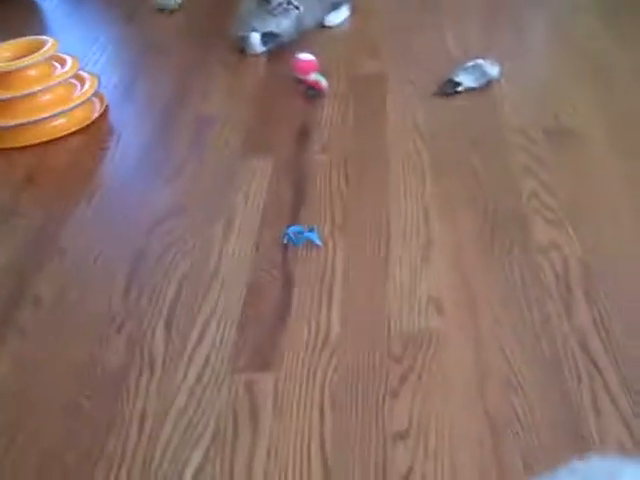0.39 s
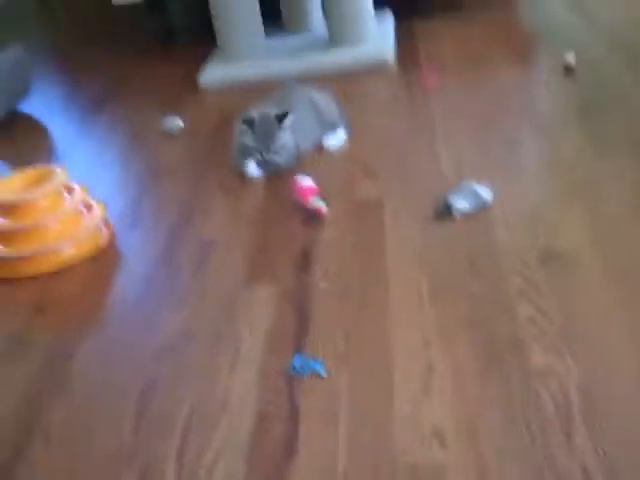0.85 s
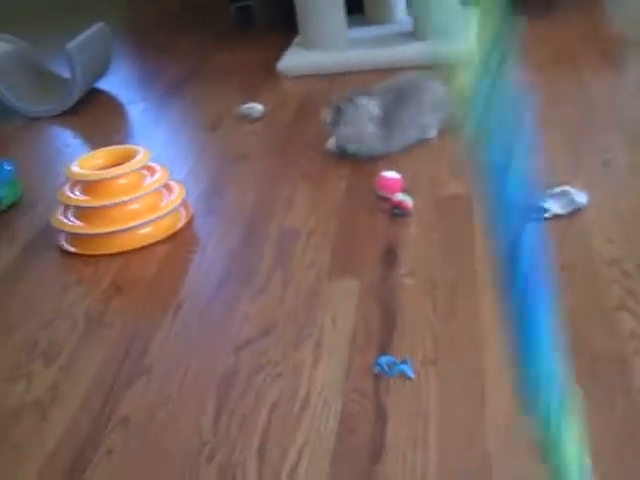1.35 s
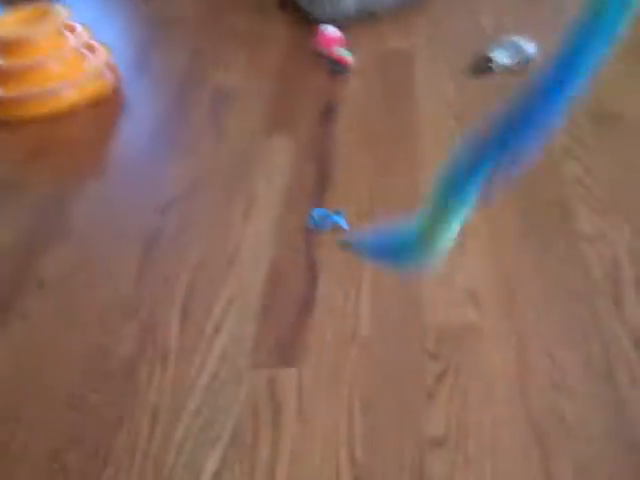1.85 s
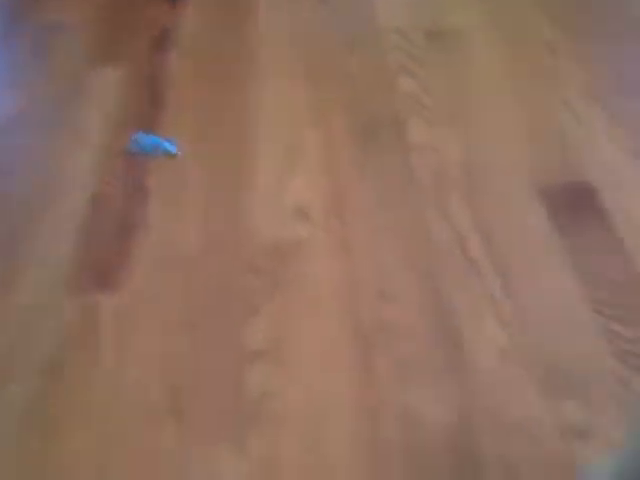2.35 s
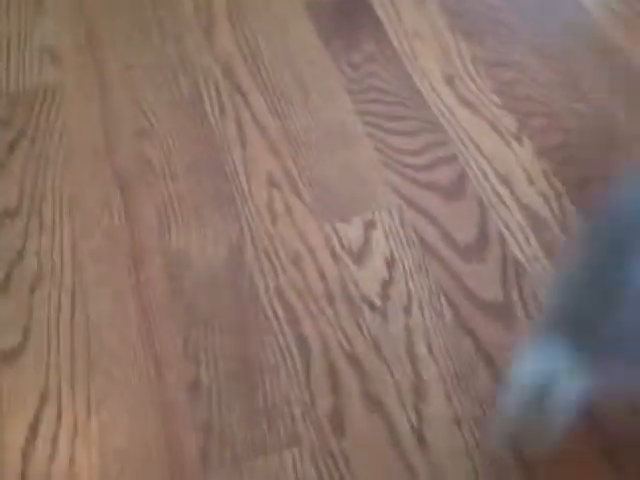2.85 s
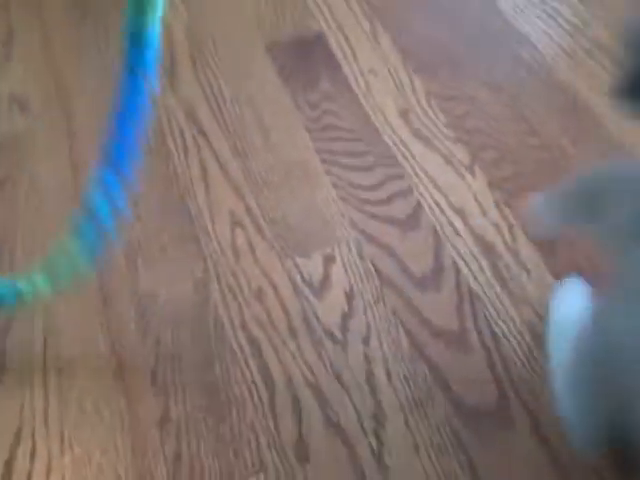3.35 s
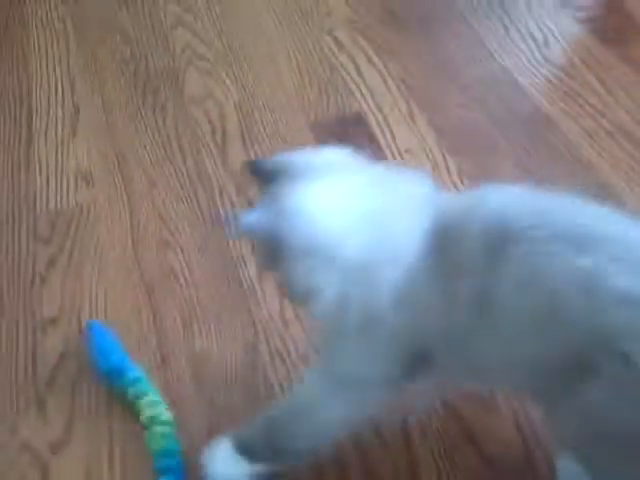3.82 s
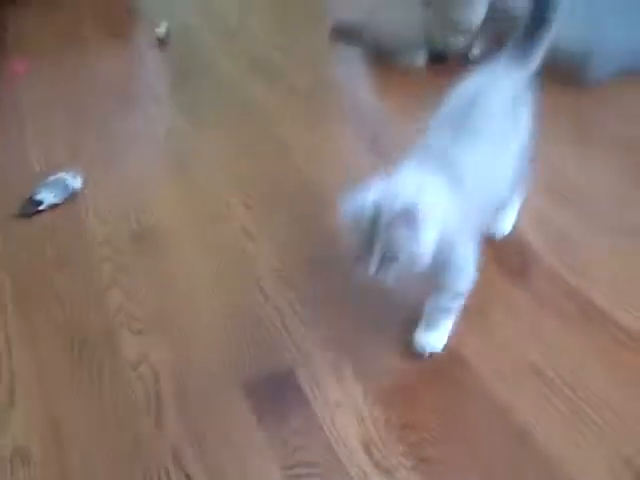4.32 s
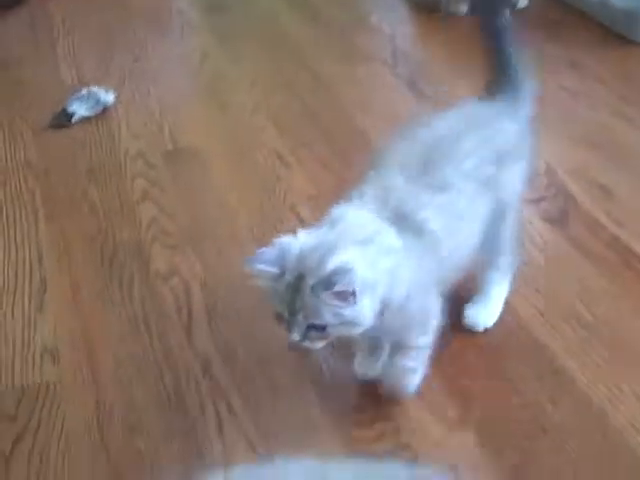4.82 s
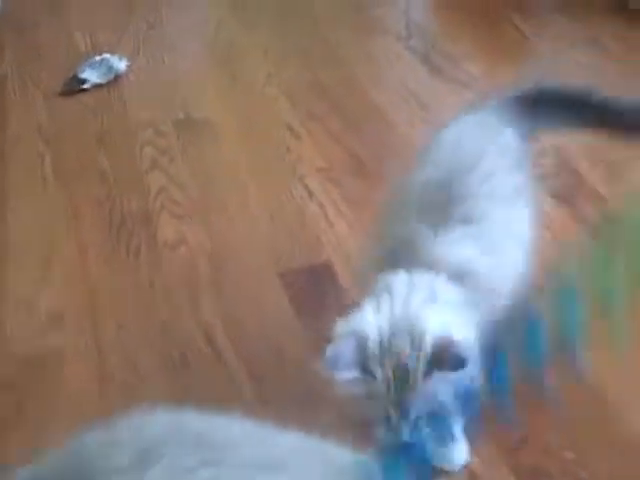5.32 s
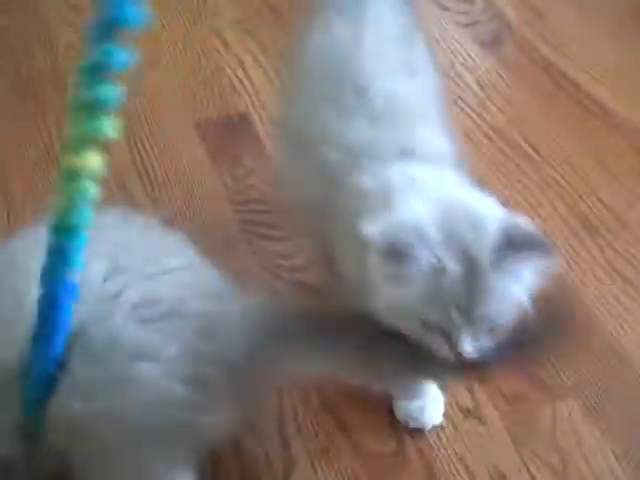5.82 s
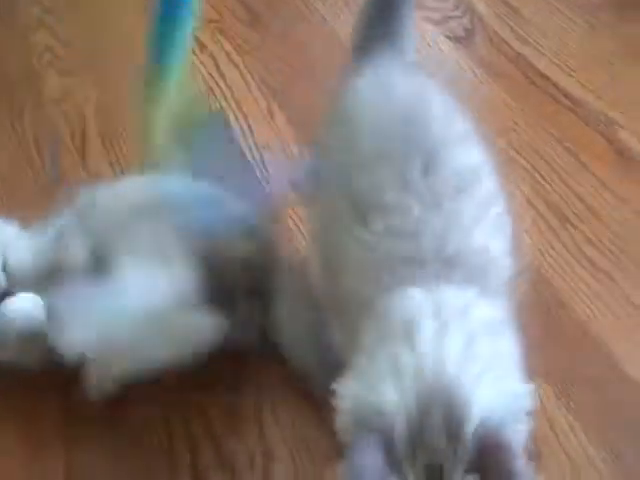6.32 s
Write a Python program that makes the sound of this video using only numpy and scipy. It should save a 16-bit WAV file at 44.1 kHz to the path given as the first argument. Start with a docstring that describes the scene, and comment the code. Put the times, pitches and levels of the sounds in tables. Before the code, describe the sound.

A quiet, bare room with reflective hardwood, heard through a small camera microphone with faint steady noise. From 0 to 0.7 s a tiny, high metallic bell jingles in quick uneven strikes, with pads scuffing, claws ticking and light knocks on the boards. Around 0.9 s feathers swish softly; a thin, breathy far mew drifts downward from 1.1 s, with a small jingle and tick near 1.5 s. It grows sparse; another faint mew starts at 2.3 s, then light taps at 3.0 s. At 3.3 s comes the hardest hit, a sharp clack with a bright jingle ringing into the room; the gain ducks at once. A second knock follows at 3.6 s. Jingles and scuffs resume at 4.1-4.8 s as the hiss creeps back up. From 5.3 s, clusters of hard ticks, short chatters and bell rattle, with a fainter mew at 5.6 s, and a last jingling scuffle at 6.2-6.4 s.

```python
"""Kittens bat a feather wand with a jingle bell over hardwood in a quiet, bare room, under steady faint noise.
At once pads scuff, the pea excites the bell's modes, claws tick and the stick knocks the boards' resonances.
Feathers swish as filtered noise from 0.9 s; thin far mews, gliding tones, follow at 1.1 and 2.3 s.
The hardest hit falls at 3.3 s; hard chatters tick from 5.3 s and a fainter mew comes at 5.6 s. Throughout, the
camera's gain follows listed notches, down at once and up in steps, and shifts the microphone's resting offset."""
import sys
import numpy as np
from scipy import signal
from scipy.fft import rfft, irfft, next_fast_len
from scipy.io import wavfile

SR = 44100
rng = np.random.default_rng(int(sys.argv[2]) if len(sys.argv) > 2 else 0)


def pcm_store(signal):
    """Save signal as 16-bit PCM."""
    levels = np.round(np.clip(np.atleast_2d(signal), -1, 1) * 32767)
    wavfile.write(sys.argv[1], SR, levels.astype(np.int16).T)


def gain_from_db(level_db):
    """Turn a decibel level (scalar or array-like) into a linear amplitude factor."""
    decades = np.asarray(level_db, float) / 20
    return 10 ** decades


N = 283563
T = np.arange(N) / SR

# camera gain moves: t/s, notches (negative: down all at once; positive: up one after another)
GAIN_MOVES = [(0, -9), (.016, -1), (.518, 10), (3.315, -14), (3.612, -3), (4.042, 8), (4.926, 9),
              (5.404, -1), (5.488, -1), (5.898, 2), (6.25, -1)]
NOTCH_DB, NOTCH_S = .5, .0342  # size of a notch, time between upward notches
# spectrum of the steady noise: f/Hz, relative density level/dB
AIR_SPECTRUM = [(24, -34), (40, -0.5), (87, -8), (117, -8), (189, -6), (225, -7), (319, -3), (431, -3),
                (1060, -3), (1360, -5), (2610, -10), (12900, -28.5), (15800, -25.5)]
AIR_DB = -58  # rms level ahead of the camera gain
# wand and paws scuffing over the boards: t/s, level/dB ahead of the mix, time to fade by 20 dB/s
SCUFFS = [(0.003, -48, 0.07), (0.08, -54, 0.31), (0.65, -50, 0.1), (4.3, -46, 0.22), (5.284, -54, 0.26),
          (5.46, -56, 0.12), (6.19, -45.5, 0.01), (6.34, -64, .15)]
# feathers and fur brushing: t/s, level/dB, time to fade by 20 dB/s (negative: grows instead)
SWISHES = [(0.865, -62, 0.1), (0.91, -60, 0.33), (4.36, -62, 0.3), (6.36, -58, -1)]
# reverberation of the bare room by bands: f/Hz, t60/s, relative level/dB
ROOM_BANDS = [(200.75, 0.4, -27), (527, 0.46, -13), (1460, 0.76, -7.0), (3340, 0.65, -10.5),
              (7430, 0.62, -11), (14000, 0.26, -8.5)]
# clear strikes of the pea: t/s, upper tones' level/dB, lower tones' and top tones' level re upper/dB
PEA_STRIKES = [(0.0153, -22.5, -2.5, -12), (0.123, -30, -3, -22), (0.1414, -25.5, -18, -24),
               (0.2299, -37, -5, -29), (0.2621, -25, -28, -23), (0.4471, -40, -21, -19),
               (0.4993, -41, -25, -18), (0.5816, -36.5, -24, -18), (0.597, -36.5, -17, -18),
               (0.6595, -28, -17, -12), (1.0347, -49, -10, -19), (1.074, -46, -11, -24),
               (1.4135, -42.5, -13, -28), (1.461, -36, -6, -23), (1.476, -31, -10, -15),
               (2.055, -49, -23, -25), (3.3148, -6.5, -5, -17), (3.33, -21.5, -2.5, -11),
               (3.3574, -30, -22, -20), (3.4007, -24.5, -24, -25.5), (3.6104, -31, 3.5, 0),
               (3.678, -34, -1, -13), (3.704, -35, -2, -14), (3.807, -30.5, -27, -18), (3.9, -45, -8, -30),
               (4.115, -47, -1, -7), (4.139, -38, -3, -9), (4.3166, -26, -16, -11),
               (4.342, -24.5, -20, -23), (4.4915, -40, -21, -24), (4.5602, -45, -2.5, -1),
               (4.665, -39.5, -7.5, -14.5), (4.8368, -44, -21, -30), (5.285, -42.5, -2, -16),
               (5.302, -34.5, -3, -8.5), (5.3293, -35.5, -7, -4), (5.4, -33, -6, -9), (5.438, -41.5, -6, 4),
               (5.4866, -43, 4.5, 1), (5.5055, -34, -3.5, -24), (5.5511, -23, -31, -24),
               (5.583, -31, -26, -32), (5.85, -48, -14, 4), (5.915, -46, -4, 0), (6.0457, -50, -14, -1),
               (6.0705, -37, -14, -14.5), (6.2387, -40, 2, -20), (6.2506, -22.5, -10, -19),
               (6.3072, -30, -22, -9.5)]
# strength of the pea's rolling between strikes: t/s, level/dB
PEA_ROLLING = [(0.0, -39.5), (0.35, -63.5), (0.7, -56), (1.0, -84), (1.08, -60), (1.38, -84), (1.55, -61),
               (1.8, -95), (3.33, -97), (3.45, -56), (3.76, -56.5), (4.0, -75), (4.27, -64.5),
               (4.33, -49.5), (4.75, -57.5), (5.05, -89), (5.3, -82), (5.5, -49), (5.7, -69), (5.87, -63),
               (6.15, -80), (6.43, -51)]
# the bell's modes, one per row: relative level/dB, t60/s
BELL_MODES = [(-9.5, 0.05), (-12.5, 0.15), (-21.5, 0.043), (-9, 0.013), (-14.5, 0.21), (-8, 0.047),
              (-13.5, 0.06), (-8, 0.04), (-9, 0.06)]
# mode frequencies of the bell, in the same order: f/Hz
BELL_MODE_HZ = [6775, 6812, 6690, 6970, 6085, 6155, 14230, 15290, 15560]
# family of each bell mode: 0 upper, 1 lower, 2 top tones
BELL_MODE_FAMILY = [0, 0, 0, 0, 1, 1, 2, 2, 2]
# claws and hard plastic: t/s, level/dB, centre f/Hz
CLAW_TICKS = [(0.016, -28, 8900), (0.0294, -42, 7800), (0.0684, -39, 7930), (0.073, -27.5, 7600),
              (0.089, -36, 7900), (0.1241, -35, 8000), (0.1334, -36.5, 8140), (0.1414, -32, 8000),
              (0.1504, -39, 8060), (0.2613, -37, 8290), (0.2858, -37.5, 7920), (0.3316, -43, 7850),
              (0.4484, -41, 7800), (0.9108, -36, 12400), (1.459, -44, 7840), (1.483, -30, 7950),
              (2.0564, -38, 7400), (2.5132, -46, 8200), (2.8202, -46, 10400), (3.019, -38.5, 7750),
              (3.025, -38, 7549), (3.0646, -38.5, 12000), (3.3134, -17.5, 8900), (3.377, -34, 13000),
              (3.401, -23, 8150), (3.6107, -36.5, 8400), (3.6935, -33, 7920), (3.702, -33, 8080),
              (3.805, -42, 8020), (4.139, -41, 7840), (4.3141, -40, 7850), (4.3241, -32, 7800),
              (4.559, -42, 12400), (5.2831, -32, 9470), (5.2994, -35.5, 9850), (5.3566, -29.5, 8060),
              (5.402, -32, 7750), (5.4345, -39, 8130), (5.4875, -27, 8600), (5.5497, -32, 8500),
              (5.5674, -37, 8190), (5.85, -41, 12600), (5.812, -46, 8400), (5.8656, -43, 8400),
              (6.1838, -42, 10330), (6.2424, -38, 9880), (6.2492, -31, 7700), (6.3674, -32.5, 8160),
              (6.38, -43, 8000), (6.4194, -37, 8254)]
# something hard chattering along the boards: t/s, length/s, rate/(ticks per s), level/dB, centre f/Hz
CHATTER_RUNS = [(5.3234, .025, 182., -40, 7900), (5.4974, .03, 115., -37.5, 7850),
                (6.189, .012, 120., -44, 10900), (6.39, .011, 330., -33.5, 8500)]
# stick and paws on the boards: t/s, level/dB, then thump, crack and bass jolt re that level/dB,
# brightness/(dB per octave)
BOARD_KNOCKS = [(0.0171, -30, -26, -22, -33, 7.5), (0.0682, -40.5, -14.5, -15, -40, 6),
                (0.0881, -39.5, -40, -12, -44, 12), (0.1107, -45, -23, -19, -42, 3),
                (0.648, -45.5, -22, -7, -28, 11), (1.4526, -44, -24, -12, -31, 14),
                (3.02, -45, 0, -3, -27, 6), (3.0302, -49, 2.5, -14, -17.5, 0.1),
                (3.0636, -36, -9.5, -12.5, -23, -3.0172), (3.3146, -14, -11.5, -13, -17, -2.5),
                (3.33, -36, -22, -19, -30, -1), (3.401, -38, -52, -22, -38, 0),
                (3.6114, -19.5, -24.5, -9, -42, 8), (4.2985, -39.5, -33, -16, -31, 6),
                (4.309, -38.5, -27, -14, -34, 5), (4.324, -37.5, -27, -14, -31, 8),
                (4.329, -38, -25, -14, -32, 4), (4.688, -49, -25.5, -5, -27, 1),
                (5.2826, -39.5, -44.5, -27, -35, -11), (5.4002, -49.5, -9, -15, -25.5, -3),
                (5.46, -47, -19, -13, -19, 4), (5.4857, -42, -10, -12, -27, 0.1),
                (5.6821, -47, -25, -13, -31, 10), (6.1843, -48, -17, -8, -28, 12),
                (6.2496, -57, -14, -11, -21, 0.1)]
# modes of the stick: f/Hz, relative level/dB, t60/s
STICK_MODES = [(1140, -10, 0.004), (1630, -6, 0.0062), (2140, 0.8, 0.0051), (2710, 0, 0.0038),
               (3460, -7, 0.0042)]
# modes of the board: f/Hz, relative level/dB, t60/s
BOARD_MODES = [(264, 6, 0.018), (353, 4, 0.024), (460, 5, 0.012), (620, 4.5, 0.016), (900, -5.5, 0.0075)]
# bass modes of the floor's joists: f/Hz, relative level/dB, t60/s
JOIST_MODES = [(105., 7, 0.035), (190., 11, 0.034)]
# far mews: t/s, length/s, pitch f/Hz, low tone's and high tones' level/dB ahead of the mix
MEW_CALLS = [(1.13, 0.6, 738.4, -59, -56.5), (2.33, 0.64814, 720, -57.5, -57), (5.6, .55, 723, -64, -81)]
# low tone of a mew: multiple of the starting pitch, share of the sag followed,
# entry, peak and end as shares of the length, relative level/dB
MEW_LOW_TONES = [(3, .99, .1, 0.45, 0.89, -0.1)]
# high tones of a mew, which peak and end earlier: columns as for the low tone
MEW_HIGH_TONES = [(4, 0.302, 0.001, .25, 0.61, 0.3), (5, .6, .05, .2, 0.62, -14.5)]
# shares: hold of the pitch (of the length), depth of the sag (of the pitch), its time (of the length)
MEW_HOLD, MEW_SAG, MEW_SAG_TIME = .22, .125, .24


def unit(x):
    """Normalization: scale to rms 1."""
    return x / np.sqrt(np.mean(x ** 2))


def band(x, hz, width, order=2):
    """Band limitation: pass frequencies around a centre."""
    edges = np.clip([hz - width / 2, hz + width / 2], 20, .49 * SR)
    return signal.sosfilt(signal.butter(order, edges, "band", fs=SR, output="sos"), x)


def walk(rate):
    """Slow random fluctuation: normal values, rate per second, joined by straight lines."""
    count = int(N * rate / SR) + 2
    return np.interp(T * rate, np.arange(count), rng.standard_normal(count))


def curve(rows):
    """Piecewise linear level in dB; -200 dB outside the rows."""
    t, db = np.transpose(rows)
    return np.interp(T, t, db, left=-200, right=-200)


def camera_gain():
    """Stepped amplification: equal steps in dB accumulate."""
    notch = np.zeros(N)
    for s, count in GAIN_MOVES:
        times = s + NOTCH_S * np.arange(count) if count > 0 else np.full(-count, s)
        np.add.at(notch, (times * SR).astype(int), np.sign(count))
    return gain_from_db(NOTCH_DB * np.cumsum(notch))


GAIN = camera_gain()


def blows(s, db):
    """Impulsive excitation, divided by the camera gain at the instant of each blow."""
    x = np.zeros(N)
    at = np.minimum((np.asarray(s) * SR).astype(int), N - 1)
    np.add.at(x, at, gain_from_db(db) / GAIN[at])
    return x


def ring(x, hz, t60):
    """Damped resonance: one mode as a turning, decaying pointer whose imaginary part is the sound."""
    pole = np.exp(2j * np.pi * hz / SR - np.log(1000) / (t60 * SR))
    return signal.lfilter([1], [1, -pole], x)


def ring_modes(modes, s, mode_db):
    """Modal superposition: each mode rings to the same blows at its own levels."""
    out = 0
    for (hz, g, t60), db in zip(modes, mode_db):
        out = out + gain_from_db(g) * ring(blows(s, db), hz, t60).imag
    return out


def air():
    """Stationary noise of room and preamp: a shaped spectrum whose octave bands flicker a little."""
    hz, db = np.transpose(AIR_SPECTRUM)
    size = next_fast_len(N)
    f = np.maximum(np.arange(size // 2 + 1) * SR / size, 1)
    noise = rfft(rng.standard_normal(size)) * gain_from_db(np.interp(np.log(f), np.log(hz), db))
    out, swell = 0, walk(2.19)
    for centre in 31.25 * 2 ** np.arange(10):
        share = np.clip(1 - np.abs(np.log2(f / centre)), 0, 1)
        flicker = gain_from_db(.5 * swell + walk(8))
        out = out + flicker * irfft(noise * share, size)[:N]
    return unit(out) * gain_from_db(AIR_DB)


def rub(strokes, hz, width, grain_db, attack_s=0.0071):
    """Friction noise: barbs, hairs and pads give a grainy hiss that sets in fast, then changes exponentially."""
    grains = rng.standard_normal(N) * gain_from_db(grain_db * walk(250))
    shape = 0
    for s, db, fade_s in strokes:
        onset = np.clip((T - s) / attack_s + 1, 0, 1)
        shape = shape + onset * gain_from_db(db - 20 * np.maximum(T - s, 0) / fade_s)
    return unit(band(grains, hz, width, order=1)) * shape / GAIN


def room(x, gap_s=0.00087):
    """Reverberation: convolution with a noise tail whose decay and strength depend on the band."""
    t, tail = T[:SR], 0
    for hz, t60, db in ROOM_BANDS:
        noise = unit(band(rng.standard_normal(SR), hz, 0.89 * hz))
        decay = np.exp(-np.log(1000) * t / t60)
        tail = tail + gain_from_db(db) * noise * decay * np.sqrt(hz / t60) / SR * 7.62
    tail = tail * np.clip(t / gap_s - .5, 0, 1)  # a short wait for the first reflections
    return signal.fftconvolve(x, tail)[:N]


def bell(scatter_db=2.5, rate=180.0, roll_family_db=(6.6, 2.5, -9.5), tumble=0.76, width=970.0):
    """Modal excitation: each strike lands on another spot of the shell, so each mode takes another share."""
    s, upper, lower, top = np.transpose(PEA_STRIKES)
    strike_db = [upper, upper + lower, upper + top]
    spot = rng.standard_normal((len(s), len(BELL_MODES)))
    # rolling: chance impacts, rate per second
    rolls = (rng.random(N) < rate / SR) * gain_from_db(curve(PEA_ROLLING)) / GAIN
    out = 0
    for k, (hz, family, (db, t60)) in enumerate(zip(BELL_MODE_HZ, BELL_MODE_FAMILY, BELL_MODES)):
        hits = blows(s, strike_db[family] + scatter_db * spot[:, k])
        hits = hits + rolls * gain_from_db(roll_family_db[family]) * rng.standard_normal(N)
        # the bell tumbles and the loose pea drags on it: each mode flutters in strength and phase
        flutter = 1 + tumble * (walk(hz / 70) + 1j * walk(hz / 70))
        out = out + gain_from_db(db) * band((flutter * ring(hits, hz, t60)).imag, hz, width, order=1)
    # the pea's own dry contact on the metal
    return out + gain_from_db(9.0) * band(rolls * rng.standard_normal(N), 9500.0, 6000.)


def ticks(length_s=0.0013, cycles=3.76):
    """Transient contact: a damped sine and a differenced noise burst, singly or in even runs."""
    rows = list(CLAW_TICKS)
    for s, length, rate, db, hz in CHATTER_RUNS:
        rows += [(s + lag, db, hz) for lag in np.arange(0, length, 1 / rate)]
    out, t = np.zeros(N + 512), np.arange(512) / SR
    for (s, db, hz), noise in zip(rows, rng.standard_normal((len(rows), 512))):
        i = int(s * SR)
        tone = np.sin(2 * np.pi * hz * t) * np.exp(-t * hz / cycles)
        scrape = 0.27455 * np.diff(noise, prepend=0) * np.exp(-t / length_s)
        out[i:i + 512] += gain_from_db(db) / GAIN[i] * (tone + scrape)
    return out[:N]


def knocks(scatter_db=3.5, crack_s=0.00056, bounce_s=(.0032, .0075, .016), bounce_db=(-3.0, -7.0, -11.0)):
    """Impact of several bodies: stick, board and joists ring; the springy stick's bounces repeat the crack."""
    s, db, thump, crack, jolt, bright = np.transpose(BOARD_KNOCKS)
    spot = scatter_db * rng.standard_normal((len(s), len(STICK_MODES) + len(BOARD_MODES)))
    stick_db = [db + bright * np.log2(hz / 2290.0) + spot[:, k] for k, (hz, _, _) in enumerate(STICK_MODES)]
    stick = ring_modes(STICK_MODES, s, stick_db)
    board = ring_modes(BOARD_MODES, s, [db + thump + spot[:, -1 - k] for k in range(len(BOARD_MODES))])
    joist = ring_modes(JOIST_MODES, s, [db + jolt] * len(JOIST_MODES))
    falls = [(0, 0), *zip(bounce_s, bounce_db)]
    hits = sum(blows(s + lag, db + crack + fall) for lag, fall in falls)
    burst = signal.lfilter([1], [1, -np.exp(-1 / (crack_s * SR))], hits) * rng.standard_normal(N)
    cracks = band(gain_from_db(10.0) * hits + gain_from_db(12.5) * burst, 3713.0, 6140.0)
    # a thin stick radiates no bass
    stick = band(stick, 4426.0, 7240.0, order=3)
    return stick + joist + cracks, band(board, 1596.0, 2830.0)


def mews(waver_hz=3.5, smear=0.49, swell=0.71):
    """Gliding tones: three breathy tones make a thin, mew-like whistle; the low one sinks most."""
    out = 0
    for s, length, pitch_hz, low_db, high_db in MEW_CALLS:
        u = (T - s) / length
        sunk = MEW_SAG * (1 - np.exp(-(np.maximum(u - MEW_HOLD, 0) / MEW_SAG_TIME) ** 1.5))
        waver = waver_hz * walk(30)
        for db, tones in ((low_db, MEW_LOW_TONES), (high_db, MEW_HIGH_TONES)):
            for multiple, follows, enters, peaks, ends, tone_db in tones:
                hz = multiple * (pitch_hz * (1 - follows * sunk) + waver)
                phase = 2 * np.pi * np.cumsum(hz) / SR
                breath = 1 + smear * (walk(140) + 1j * walk(140))
                shape = np.interp(u, [enters, peaks, ends], [0, 1, 0]) ** swell
                out = out + gain_from_db(db + tone_db) * shape * (breath * np.exp(1j * phase)).imag
    return out


def scene():
    """Superposition: near sources and far mews, direct and reverberant, over the steady noise."""
    scuff = rub(SCUFFS, 2290.0, 2430.0, 10.2)
    swish = rub(SWISHES, 13300.0, 7000., 3.17)
    stick, board = knocks()
    far = mews()
    wood = stick + gain_from_db(-3.0) * scuff
    near = bell() + wood + board + ticks() + swish
    # wood, board and above all the far mews excite the room more
    sent = near + gain_from_db(0.5) * wood + gain_from_db(4.0) * board + gain_from_db(7.0) * far
    return (near + 0.53 * far + room(sent) + air())[None]


def top_cut(x):
    """Nothing passes above the cut-off."""
    return signal.sosfilt(signal.butter(12, 16670, fs=SR, output="sos"), x)


def record(dry, offset=-.059, settle_s=.09, offset_at_start=.004, ceiling=.5, top_hz=15800):
    """Saturation and AC coupling: peaks round, the top is cut, and gain steps shift an offset that sags away."""
    # the gain also scales a constant offset; the coupling capacitor lets each step of it decay
    keep = np.exp(-1 / (settle_s * SR))
    shift = signal.lfilter([1, -1], [1, -keep], offset * (GAIN - GAIN[0]))
    shift = shift + offset_at_start * keep ** np.arange(N)
    rounded = ceiling * np.tanh(dry * GAIN / ceiling)
    sound = signal.sosfilt(signal.ellip(8, .3, 45, top_hz, fs=SR, output="sos"), rounded)
    mix = sound + shift - .0005  # a small constant offset remains
    return top_cut(mix)


dry = scene()
out = record(dry)
pcm_store(out)
```